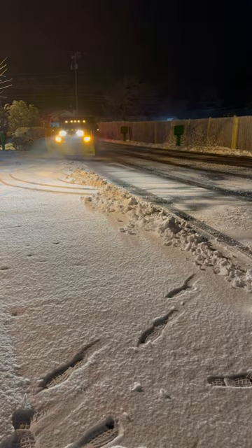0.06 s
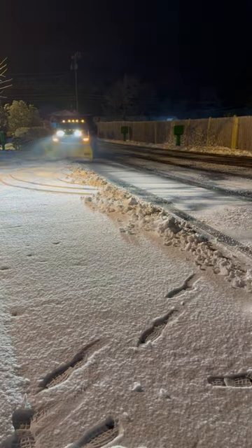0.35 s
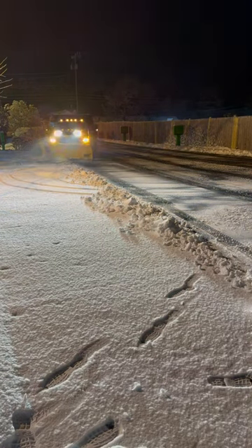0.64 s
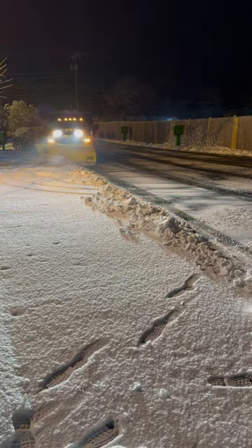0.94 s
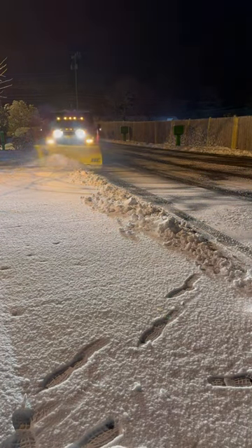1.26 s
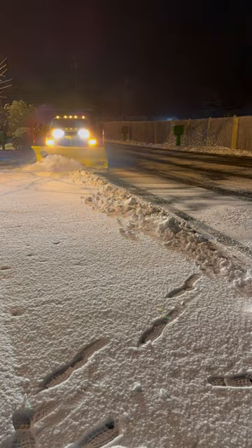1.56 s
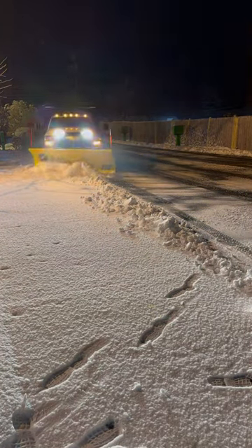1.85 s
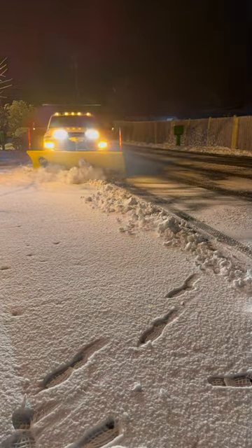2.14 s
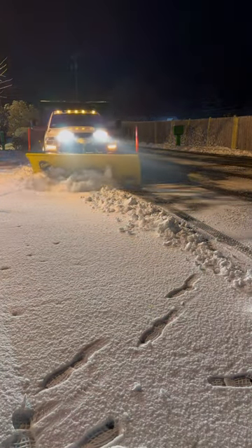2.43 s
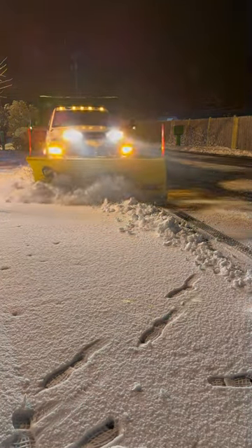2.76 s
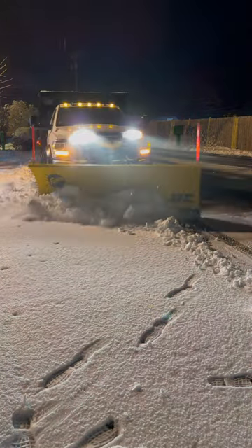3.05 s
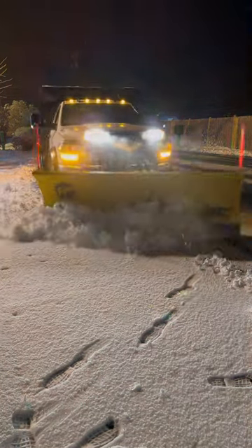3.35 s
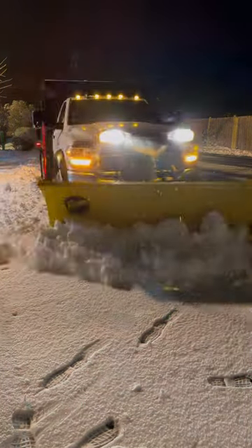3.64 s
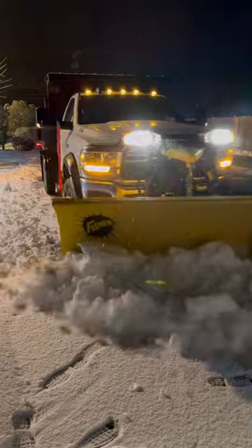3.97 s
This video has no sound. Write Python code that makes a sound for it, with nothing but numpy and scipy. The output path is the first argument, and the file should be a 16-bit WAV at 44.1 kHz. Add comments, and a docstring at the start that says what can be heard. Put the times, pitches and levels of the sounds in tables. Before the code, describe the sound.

A steel snowplow blade judders and bumps across a snowy lot, ahead and slightly left, over a rumbling truck engine and faint hissing snow. From halfway it bites in short, close, rasping scrapes, and a thin whine rises near the end.

```python
"""A steel plow blade judders over pavement, with the truck's engine rumbling underneath.
As it crosses a snowy lot, ahead and slightly left, the blade drags on grit, bumps on ridges and
throws hissing snow. From about halfway its edge bites in short, close, rasping scrapes: stick-slip
friction that rings the steel. Near the end, as the engine slows, a thin whine rises."""
import sys
import numpy as np
from scipy.fft import rfft, irfft, next_fast_len
from scipy.io import wavfile
from scipy.ndimage import map_coordinates

SR = 44100
rng = np.random.default_rng(int(sys.argv[2]) if len(sys.argv) > 2 else 0)


def materialize(psi):
    """Save the field psi as 16-bit PCM at rate SR to the path in sys.argv[1].

    A 1-D psi becomes a single channel; in a 2-D psi each row is a channel.
    """
    bounded = np.clip(np.atleast_2d(psi).T, -1, 1)
    quanta = np.round(bounded * 32767).astype(np.int16)
    wavfile.write(sys.argv[1], SR, quanta)


N = 176400


def amp(db):
    """Decibels to gain."""
    return 10 ** (np.asarray(db) / 20)


def unit(x):
    """Scale to rms 1."""
    return x / np.sqrt(np.mean(x ** 2) + 1e-20)


def clock():
    """Time of each sample in seconds."""
    return np.arange(N) / SR


def along(points, hz):
    """Interpolate (Hz, value) points on a log frequency axis."""
    freqs, values = np.transpose(points)
    return np.interp(np.log(hz + 1), np.log(freqs + 1), values)


def curves(rows):
    """One automation curve for each column after the time."""
    times, *columns = np.transpose(rows)
    return [np.interp(clock(), times, column) for column in columns]


def swells(rows):
    """A gain envelope of bell-shaped swells."""
    return sum(amp(db) * np.exp(-.5 * ((clock() - centre) / width) ** 2) for centre, width, db in rows)


def wobble(rate):
    """A smooth random curve, rate knots a second."""
    return map_coordinates(rng.standard_normal(int(N * rate / SR) + 4), [clock() * rate])


def filtered(x, response):
    """Pass x through a complex frequency response."""
    size = next_fast_len(N + SR // 2)
    return irfft(rfft(x, size) * response(np.fft.rfftfreq(size, 1 / SR)), size)[..., :N]


def colour(points):
    """An EQ response from (Hz, dB) points."""
    return lambda hz: amp(along(points, hz))


def body(modes, eq):
    """The response of (Hz, width Hz, dB) resonances, shaped by an EQ."""
    return lambda hz: eq(hz) * sum(
        amp(db) * 1j * hz * width / (centre ** 2 - hz ** 2 + 1j * hz * width)
        for centre, width, db in modes)


# Stereo width of the textures. Each row: frequency in Hz, left-right correlation (1 is mono).
STEREO_LIKENESS = [(100, .999), (250, 0.99), (500, 0.95), (1300, 0.94), (2000, 1), (2800, 0.82),
                   (3900, 0.31), (5600, 0.057), (8500, 1), (11500, 0.97), (14500, 0.47)]

def grains(rate, response, spread_db, smooth):
    """Stereo friction at rms 1: rate random slips a second over smooth rubbing, through a response."""
    hits = (rng.random((2, N)) < rate / SR) * rng.choice([-1, 1], (2, N))
    slips = hits * amp(spread_db * rng.standard_normal((2, N)))
    force = unit(slips) + smooth * rng.standard_normal((2, N))

    def mid_side(hz):
        angle = np.arccos(np.clip(along(STEREO_LIKENESS, hz), -1, 1)) / 2
        return response(hz) * np.array([np.cos(angle), np.sin(angle)])

    mid, side = filtered(force, mid_side)
    return unit(np.array([mid + side, mid - side]))


# Ride of the snow spray. Each row: time in seconds, relative level in dB.
SPRAY_LEVEL = [(0, -61.5), (.6, -59), (1.3, -56.5), (1.9, -54.5), (2.2, -51.5), (2.5, -54), (2.72, -51.5),
               (2.9, -57), (3.2, -53), (3.33, -55), (3.4, -49.5), (3.55, -54.5), (4, -54.5)]
# Powder puffs and crusty lumps. Each row: centre in seconds, half width in seconds, level in dB.
PUFFS = [(2.343, 0.012, -47)]
CRUNCHES = [(.19, 0.11, -45), (.55, 0.019, -68), (.925, 0.036, -41.5), (1.65, .028, -48),
            (3.292, 0.0084, -41.5), (3.352, .014, -45), (3.5, 0.03, -51)]
# Airy powder and crisp crust. Each row: frequency in Hz, gain in dB.
POWDER_EQ = [(3000, -26), (6000, -6.5), (8500, -1.5), (11000, 1), (13000, -3), (15500, -1)]
CRUST_EQ = [(1000, -19), (2200, 8), (4500, -0.5), (7000, -9.5), (12000, -52)]

def snow():
    """Powder hisses off the blade and crusty lumps crunch."""
    db, = curves(SPRAY_LEVEL)
    powder = grains(6000, colour(POWDER_EQ), spread_db=3, smooth=1)
    spray = amp(db + 4 + 0.68 * wobble(20)) + swells(PUFFS)
    crust = grains(1800, colour(CRUST_EQ), spread_db=4.5, smooth=0.96)
    return powder * spray + crust * swells(CRUNCHES)


# The whine's climb. Each row: time in seconds, pitch in Hz, relative level in dB.
WHINE_RISE = [(3.52, 800, -60), (3.62, 842, -47), (3.68, 873, -36), (3.73, 900, -50), (3.79, 921, -45),
              (3.86, 941, -43.5), (3.93, 941, -43.5), (4, 945, -40.5)]
# Partials under the whine. Each row: fraction of its pitch, level against it in dB.
UNDERTONES = [(0.71, -5), (0.47, -9.5), (0.5, -11)]

def whine():
    """A thin, fluttering whine from the truck stays faint, then swells and rises near the end."""
    hz, db = curves(WHINE_RISE)
    phase = 2 * np.pi * np.cumsum(hz * (1 + 0.006 * wobble(70))) / SR
    below = sum(amp(level + 1.6 * wobble(25)) * np.sin(share * phase) for share, level in UNDERTONES)
    tone = amp(2.4 * wobble(35)) * np.sin(phase)
    return amp(db + 4) * (tone + below)


# Engine revs. Each row: time in seconds, firing rate in Hz, relative exhaust level in dB.
ENGINE_REVS = [(0, 69.7, -46), (.3, 68.24, -30), (.6, 64.5, -29), (.9, 58.3, -33.5), (1.08, 59.9, -32),
               (1.3, 63.9, -35), (1.6, 65.6, -30), (1.85, 62.55, -30.5), (2.0, 62, -31), (2.28, 74.8, -32),
               (2.6, 76.63, -28), (2.85, 72.3, -23.5), (3.02, 66.2, -31.5), (3.24, 56.16, -29.5),
               (3.42, 51.4, -34), (3.7, 49.17, -29), (4, 49.6, -31)]
# Exhaust tones. Each row: multiple of the firing rate, relative level in dB.
EXHAUST_ORDERS = [(1, 3), (1.25, -15), (1.5, -5.5), (1.75, -5.5), (2, -8), (2.5, -15.5), (3, -12.5)]
# Tone of the engine bay and fan. Each row: frequency in Hz, gain in dB.
BAY_EQ = [(40, 5), (68, 13), (100, 9), (150, 2.5), (230, -3), (380, -5.5), (460, 0), (620, -2.5), (720, -8),
          (1000, -22), (1400, -24), (1900, -18.5), (2800, -20), (4000, -27), (7000, -31), (14000, -74)]
BAY_END_DB, BAY_DB_PER_S = -34, -0.5

def engine():
    """The rumbling bed: low exhaust orders, and engine bay noise that pulses with each firing."""
    hz, db = curves(ENGINE_REVS)
    phase = 2 * np.pi * np.cumsum(hz) / SR
    exhaust = np.zeros(N)
    for order, level in EXHAUST_ORDERS:
        gain = amp(db + level + 0.7 * wobble(11))
        exhaust += gain * np.sin(order * phase + rng.uniform(0, 2 * np.pi) + 0.039 * wobble(8.8))
    muffler = colour([(35, -15), (50, -1.5), (62, 1), (80, -2)])
    bay = grains(3000, colour(BAY_EQ), spread_db=3, smooth=1)
    clatter = unit(bay * (1 + 0.13 * np.cos(phase)))
    return filtered(exhaust, muffler) + clatter * amp(BAY_END_DB + BAY_DB_PER_S * (clock() - N / SR))


# Ride of the continuous scrape. Each row: time in seconds, relative level in dB.
DRAG_LEVEL = [(0, -24), (.06, -24.5), (.2, -25.5), (.4, -30.5), (.49, -29.5), (.55, -27.5), (.6, -31),
              (.85, -30.5), (.92, -29.5), (1.0, -32), (1.13, -33.5), (1.25, -30.5), (1.57, -32),
              (1.63, -28.5), (1.72, -28.5), (1.84, -28), (1.93, -28.5), (2.03, -32.5), (2.12, -28),
              (2.22, -28), (2.36, -37), (2.51, -41), (2.7, -35), (2.9, -32.5), (3.03, -38), (3.14, -36),
              (3.29, -42.5), (3.5, -28), (3.62, -34.5), (3.76, -41), (4, -47)]
# Tone of the grit. Each row: frequency in Hz, gain in dB.
GRIT_EQ = [(200, -9.5), (360, 0.5), (450, -5.5), (620, -1), (720, -4), (920, -3), (1350, -10.5),
           (1950, -16), (2750, -22.5), (3850, -30), (5700, -37), (9000, -45), (15000, -64)]
# Ring of the dragging edge. Each row: frequency in Hz, width in Hz, gain in dB.
DRAG_MODES = [(562, 12, -3), (646.3, 18, 4.5), (751, 25, -1), (1012, 9.9, -12), (1223, 20, -6)]
RING_START_DB, RING_DB_PER_S, RING_MAX_DB = -12.5, 2.5, -3  # against the grit

def drag():
    """The cutting edge drags over grit under the snow, its faint ring growing on the way."""
    db, = curves(DRAG_LEVEL)
    eq = colour([(250, -35), (500, 1.5), (1200, -4.5), (2500, -46)])
    grit = grains(1800, colour(GRIT_EQ), spread_db=2, smooth=0.73)
    ring = grains(700, body(DRAG_MODES, eq), spread_db=5.5, smooth=0.95)
    ring_db = np.minimum(RING_START_DB + RING_DB_PER_S * clock(), RING_MAX_DB)
    return (grit + amp(ring_db) * ring) * amp(db - 0.4 + 0.86 * wobble(29.92))


# Patches of hard grit. Each row: centre in seconds, half width in seconds, level in dB.
GRINDS = [(.13, 0.13, -39.5), (.53, .03, -44), (.925, 0.032, -41), (1.65, 0.03, -43.5), (2.81, 0.025, -50),
          (3.39, 0.026, -39.5), (3.5, .028, -38)]
# Bright ring of the steel. Each row: frequency in Hz, width in Hz, gain in dB.
GRIND_MODES = [(1280, 70, -5), (1780, 220, 0), (1950, 140, 3), (2620, 100, -0.5)]

def grinding():
    """Hard grit under the edge excites the high modes of the steel."""
    eq = colour([(600, -22), (1200, 2), (2800, 1), (5000, -14), (10000, -33)])
    return grains(1200, body(GRIND_MODES, eq), spread_db=0.5, smooth=1) * swells(GRINDS)


# Hits on ridges. Each row: start in seconds, relative boom level in dB, relative clang level in dB.
BUMPS = [(.005, -26, -29), (0.161, -15.5, -23), (.29, -26.5, -17.5), (.70, -35, -16), (.882, -12, -19.5),
         (0.943, -23, -23.5), (1.035, -17, -23), (1.605, -15.5, -23.5), (1.725, -31, -16.5),
         (1.921, -24, -18), (2.102, -17.5, -28), (2.19, -16.5, -32), (2.41, -23, -35), (2.679, -21, -29),
         (2.8, -16, -19), (2.961, -14.5, -23), (3.175, -23, -20.5), (3.468, -15, -30), (3.682, -28, -42)]
# Frame boom and blade clang. Each row: frequency in Hz, gain in dB, seconds to fade by 60 dB.
BOOM_MODES = [(64.5, -8, 0.25), (89.6, 2.5, 0.23), (105.2, -9.5, 0.23)]
CLANG_MODES = [(172.6, 2.5, 0.2), (256.5, -3.5, 0.33), (295.7, -5, 0.14)]
BUMP_ATTACK_S = 0.0058

def bumps():
    """Ridges jolt the plow: its frame booms and the blade gives a dull clang."""
    out, t = np.zeros(N + SR), np.arange(SR // 2) / SR

    def ring(modes):
        return sum(amp(db + rng.normal(0, 1) - 60 * t / t60)
                   * np.sin(2 * np.pi * (hz * (1 + 0.021 * rng.normal()) * t + rng.random()))
                   for hz, db, t60 in modes)

    attack = 1 - np.exp(-(t / BUMP_ATTACK_S) ** 2)
    for start, boom_db, clang_db in BUMPS:
        blow = amp(boom_db) * ring(BOOM_MODES) + amp(clang_db) * ring(CLANG_MODES)
        out[round(start * SR):][:len(t)] += blow * attack
    return filtered(out[:N], colour([(30, -23), (50, 6), (70, 0.5)]))


# Ride of the judder. Each row: time in seconds, relative level in dB.
JUDDER_LEVEL = [(0, -17.5), (.08, -24), (.25, -21), (.62, -28), (.72, -22.5), (.86, -26), (.94, -25),
                (1.13, -29), (1.25, -24.5), (1.57, -26.5), (1.64, -20), (1.75, -22), (1.86, -25),
                (2.2, -26.5), (2.33, -34), (2.52, -40), (2.68, -27), (2.83, -27.5), (2.9, -35), (3.1, -30),
                (3.19, -27), (3.27, -39.5), (3.45, -25.5), (3.57, -31), (3.74, -46), (4, -46)]
# Low body of the blade. Each row: frequency in Hz, width in Hz, gain in dB.
BLADE_MODES = [(88.2, 48, 1), (114, 31, -4.5), (169, 25, 0.5), (192.5, 46, 1), (263, 47, -1.5),
               (293.5, 17, -3.5), (340, 24, -10)]

def judder():
    """Uneven slips shake the low modes of the blade."""
    db, = curves(JUDDER_LEVEL)
    eq = colour([(30, -3), (60, -8.5), (90, 2.5), (350, -2), (500, -37), (1200, -48)])
    shake = grains(260, body(BLADE_MODES, eq), spread_db=0, smooth=0.47)
    return shake * amp(db + 0.47 + 0.73 * wobble(22.15))


CHATTER_FLUTTER_DB, CHATTER_JITTER = 2.2, 0.0304  # jitter is a fraction of the pitch

def chatter(gain, hz):
    """The edge sticks and slips in a rough tone; gain and hz hold one curve for each bite."""
    pitch = hz * (1 + CHATTER_JITTER * wobble(220))
    slips = np.sin(2 * np.pi * (np.cumsum(pitch, axis=1) / SR + rng.random((len(hz), 1))))
    return (gain * slips).sum(0) * amp(CHATTER_FLUTTER_DB * wobble(110))


# The close scrapes. Each row: start, attack and length in seconds, relative level in dB, upper ring
# trim in dB, groan trim in dB, chatter pitch in Hz, its glide in Hz per second, chatter trim in dB.
BITES = [(1.76, .05, .22, -34, -1, -1, 630, 0, -5), (2.12, .03, .11, -33, 2, -3, 600, -300, -7),
         (2.392, .003, .026, -31.5, 3.5, -5, 560, 0, -9), (2.525, .0017, .035, -29, 0.5, 2, 596, -2, -6),
         (2.607, 0.0072, 0.046, -27.5, -0.5, -8, 626, -1100, 1.5),
         (2.671, 0.0063, 0.034, -24, -15, -3.5, 641.8, -1700, -0.5),
         (2.774, .008, 0.031, -18.5, -2.5, -7, 612, 600, -3.5),
         (2.808, 0.011, .04, -19, 2.5, 0.5, 647.3, -1200, -1),
         (2.874, 0.0056, 0.054, -28.5, -6, -6, 547, -300, 0), (2.94, .008, 0.015, -24, -9, -17, 525, 0, -4),
         (3.065, .06, .11, -28.5, -3.5, -1.5, 551.7, 300, -2.5),
         (3.338, .006, 0.029, -25, -1.5, -2.5, 469, 1800, 1.5),
         (3.365, 0.0088, 0.02, -23.5, -11, 9, 531.7, 698, 4.5),
         (3.408, .02, 0.05, -20.5, -6.5, -2.5, 633.6, 900, -1),
         (3.473, 0.0056, 0.043, -18.5, -9, -2, 673, -600, -4),
         (3.524, 0.015, .04, -22.5, -15, -1, 598, -1400, 1),
         (3.644, .02, 0.043, -31, -2.5, 1, 516, -500, -8)]
# Lower and upper ring of the edge, and groan of the whole blade bending.
# Each row: frequency in Hz, width in Hz, gain in dB.
EDGE_LOW_MODES = [(475, 26, 1), (514, 28, 0.5), (567, 25, 1.5), (634, 51, -1.5)]
EDGE_HIGH_MODES = [(767, 35, -0.5), (850, 36, -2.5), (890, 22, 0.5), (1025, 11, 0), (1240, 16, -14),
                   (1880, 56, -11), (2680, 67, -15)]
GROAN_MODES = [(241, 25, 2), (390, 24, -4.5)]
# Tone of the rasp. Each row: frequency in Hz, gain in dB.
RASP_EQ = [(110, -20), (180, -7), (240, 1.5), (330, -12), (430, -12), (620, 8), (900, -21), (1150, -20),
           (1600, -18), (1950, -23.5), (2700, -23.5), (4000, -37), (7000, -52), (15000, -72)]
BITE_RELEASE_S = 0.018

def bites():
    """The edge catches bare pavement: bursts of slips rasp, chatter, ring the steel and bend it."""
    start, attack, length, db, upper_db, groan_db, hz, glide, chatter_db = np.transpose(BITES)[..., None]
    age = clock() - start
    release = np.exp(-np.maximum(age - length, 0) / BITE_RELEASE_S)
    pressure = amp(db) * np.clip(age / attack, 0, 1) * release
    eq = colour([(80, -29), (220, 4), (700, -5), (2000, -15.5), (6000, -24)])
    lower, upper, groan = (grains(900, body(modes, eq), spread_db=2, smooth=0.49)
                           for modes in (EDGE_LOW_MODES, EDGE_HIGH_MODES, GROAN_MODES))
    rasp = grains(900, colour(RASP_EQ), spread_db=3.5, smooth=0.57)
    chatter_hz = hz + glide * np.clip(age, 0, length + BITE_RELEASE_S)
    return (pressure.sum(0) * (amp(-4) * lower + amp(-6) * rasp)
            + (pressure * amp(upper_db - 5.5)).sum(0) * upper
            + (pressure * amp(groan_db - 6.5)).sum(0) * groan
            + chatter(pressure * amp(chatter_db), chatter_hz))


# Panning by level. Each row: frequency in Hz, left over right in dB.
LEFT_BIAS = [(120, 0.1), (250, 0.05), (520, 2.5), (900, 2.5), (1350, 2.5), (1900, -0.5), (2700, -1),
             (3800, 7.5), (5600, 4), (8500, 1), (11500, 0)]
# Panning by phase. Each row: frequency in Hz, lead of the left channel in radians.
LEFT_LEAD = [(60, 0.037), (200, 0.058), (500, 0.063), (1450, .1), (1950, 0.72), (2700, 1.93), (3800, 2.57),
             (5600, 0.43), (7500, 2.27), (9300, 3.27), (11500, 1.64), (15500, 0.55)]

def scene():
    """The whole truck, placed ahead and slightly to the left."""
    truck = engine() + judder() + drag() + bites() + grinding() + bumps() + whine() + snow()
    sides = np.array([[.5], [-.5]])
    pan = lambda hz: amp(sides * along(LEFT_BIAS, hz)) * np.exp(1j * sides * along(LEFT_LEAD, hz))
    return filtered(truck, pan)


TOP_HZ = 15800

def record(dry):
    """Master EQ: thin the deep bass and cut everything above the band limit."""
    low_cut = colour([(10, -38), (25, -21), (33, -4.5), (45, -0.5)])
    return filtered(dry, lambda hz: low_cut(hz) * (hz < TOP_HZ))


dry = scene()
out = record(dry)
materialize(out)
```